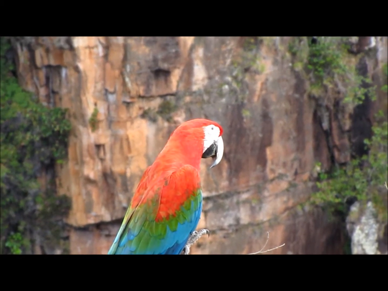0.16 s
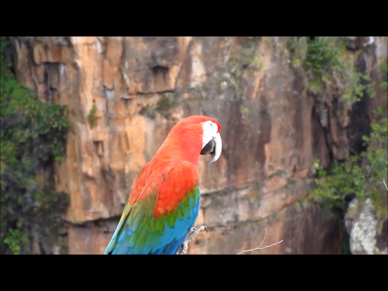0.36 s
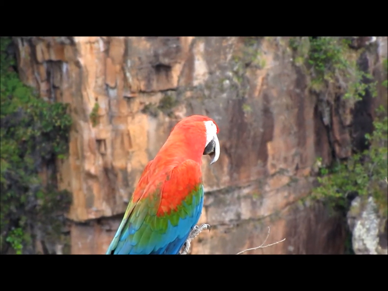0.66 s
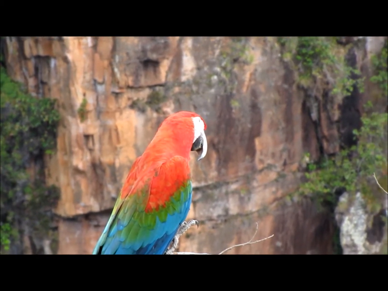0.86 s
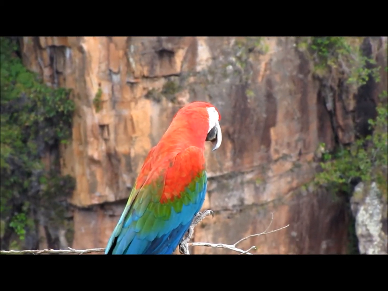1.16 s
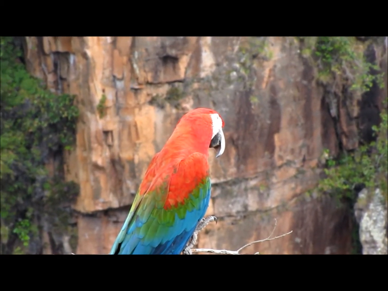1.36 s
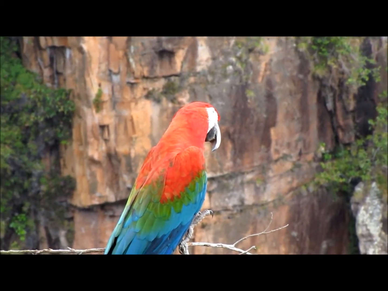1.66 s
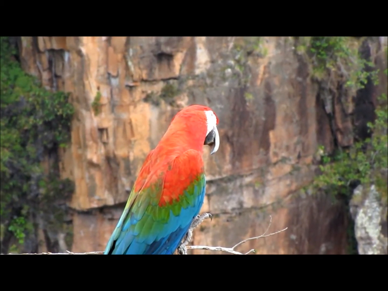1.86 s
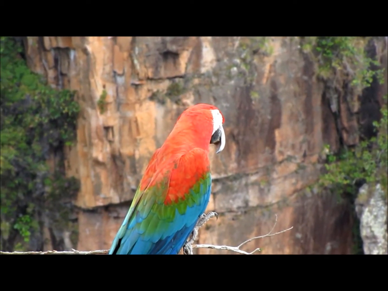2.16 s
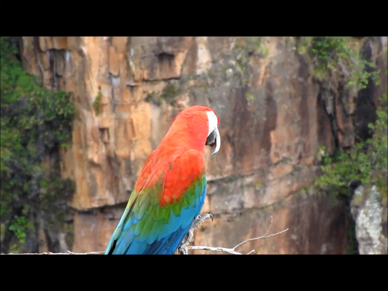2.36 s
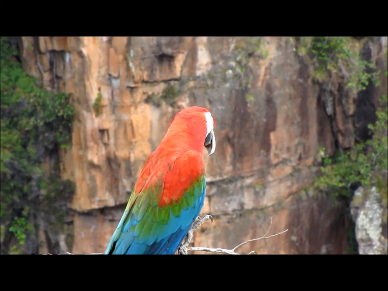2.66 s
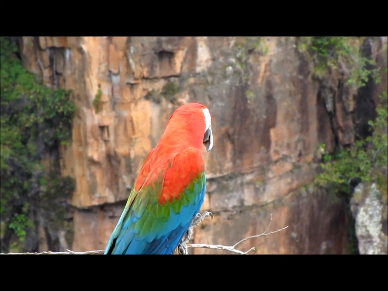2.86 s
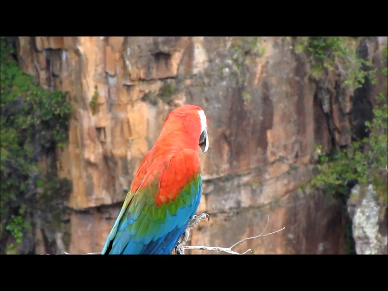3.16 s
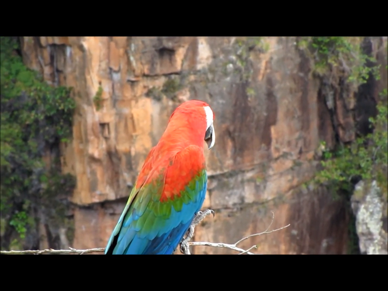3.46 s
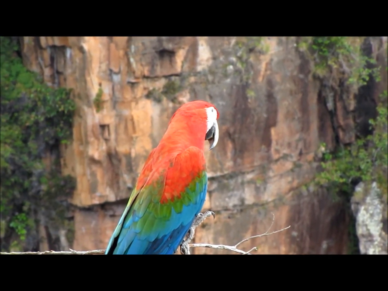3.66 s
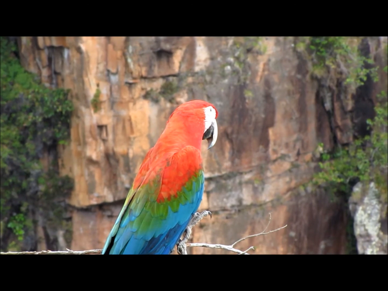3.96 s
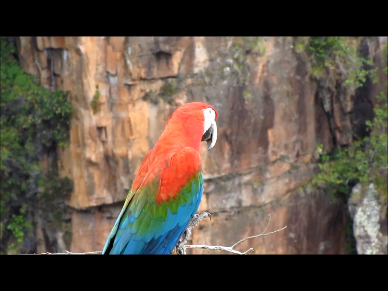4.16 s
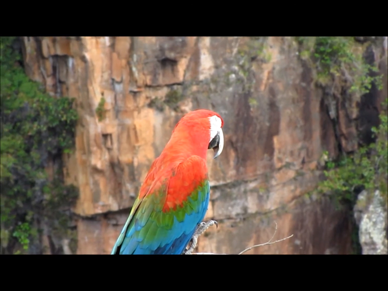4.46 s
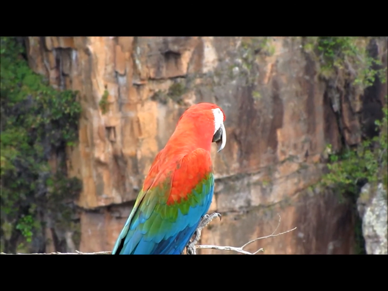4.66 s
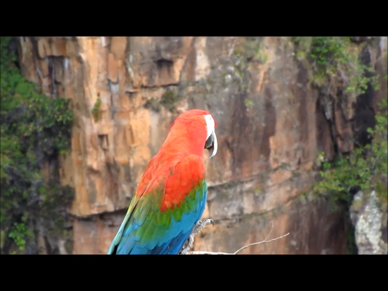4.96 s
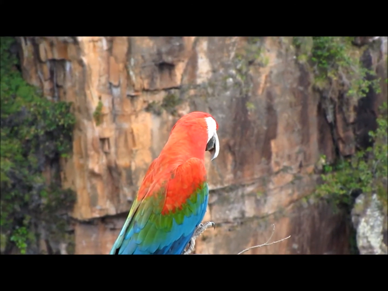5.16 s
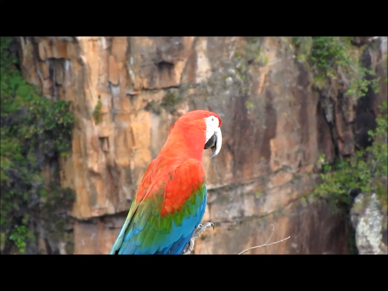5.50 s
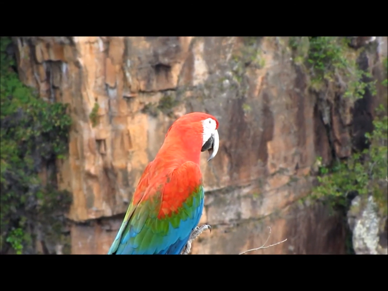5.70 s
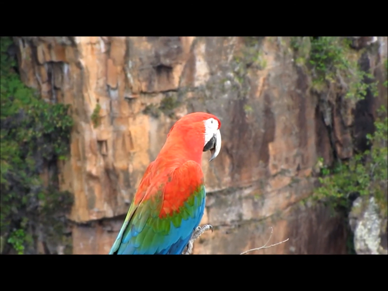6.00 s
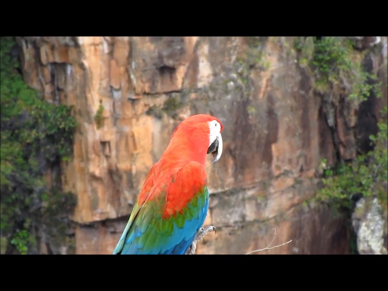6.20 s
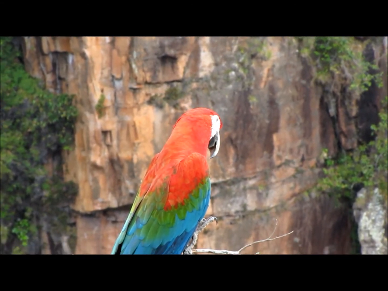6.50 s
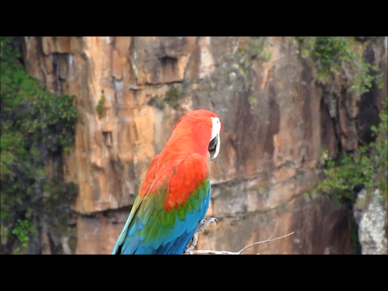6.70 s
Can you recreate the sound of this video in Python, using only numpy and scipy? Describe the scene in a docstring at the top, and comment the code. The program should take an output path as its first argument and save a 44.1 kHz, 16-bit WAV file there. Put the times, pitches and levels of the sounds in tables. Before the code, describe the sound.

A large parrot squawks twice, close to the microphone, in a rocky gorge. The first call is a rasping double syllable with a rattle at its end; the second, after a pause, is one brighter screech with a thin wheeze. Low wind buffeting is strongest at the start, eases in the middle and comes back late. A few dry scrapes open the scene, over a steady distant rush of leaves.

```python
"""A gorge, in front of a cliff: a macaw close by gives two harsh squawks that swell, hold and break off.
The membranes of its syrinx make a chaotic rasp that locks now and then into a louder clear tone or a
subharmonic rattle, shaped by the throat and open beak. Wind buffets mostly the right side of the mic,
a few dry scuffs sound nearby, and air and foliage rush steadily behind, over a faint low drone."""
import sys
import numpy as np
from scipy import signal
from scipy.fft import rfft, irfft, next_fast_len
from scipy.io import wavfile
from scipy.ndimage import uniform_filter1d, map_coordinates

SR = 44100
rng = np.random.default_rng(int(sys.argv[2]) if len(sys.argv) > 2 else 0)


def generate_wav(sig):
    """Save sig (samples, or channels by samples) to the path in sys.argv[1] as 16-bit PCM at SR."""
    pcm = np.round(np.clip(np.atleast_2d(sig).T, -1, 1) * 32767).astype(np.int16)
    wavfile.write(sys.argv[1], SR, pcm)


N = 301644


def amp(db):
    """Decibels to gain."""
    return 10 ** (np.asarray(db) / 20)


def unit(x):
    """Scale to rms 1."""
    return x / np.sqrt(np.mean(x ** 2) + 1e-20)


def steady(x):
    """Hold the short-term rms at 1."""
    return x / np.sqrt(np.abs(uniform_filter1d(x * x, size=700)) + 1e-6)


def along(points, hz):
    """Read (freq_hz, value) points at hz, on a log frequency axis."""
    freqs, values = np.transpose(points)
    return np.interp(np.log(hz + 1), np.log(freqs + 1), values)


def curves(rows):
    """Automation: one value per sample for each column after the time."""
    times, *columns = np.transpose(rows)
    return [np.interp(np.arange(N) / SR, np.sort(times), column) for column in columns]


def during(start, length, edge_s):
    """A gate open for length seconds from start, with soft edges."""
    t = np.arange(N) / SR
    return np.clip(.5 + np.minimum(t - start, start + length - t) / edge_s, 0, 1)


def wobble(rate):
    """A smooth random curve, rate knots a second."""
    return map_coordinates(rng.standard_normal(int(N * rate / SR) + 4), [np.arange(N) * rate / SR])


def filtered(x, response):
    """Multiply the spectrum of x by response(hz)."""
    size = next_fast_len(N + SR // 4)
    return irfft(rfft(x, size) * response(np.fft.rfftfreq(size, 1 / SR)), size)[..., :N]


def coloured(x, points):
    """EQ x with a (freq_hz, gain_db) curve."""
    return filtered(x, lambda hz: amp(along(points, hz)))


def split(x, edge_hz):
    """Crossover: the parts of x below and above an edge."""
    low = filtered(x, lambda hz: 1 / (1 + (hz / edge_hz) ** 20))
    return low, x - low


def sides(db):
    """Left and right gains for a left-minus-right level difference."""
    return amp(np.array([db, -db]) / 2)


def from_left(x, lead_s):
    """The left channel hears x lead_s before the right one."""
    return filtered(x, lambda hz: np.exp(1j * np.pi * hz * lead_s * np.array([[1], [-1]])))


def gorge():
    """A far, even rush of air and foliage, narrow in the bass and wide in the treble."""
    # strength of the rush: time_s, level_db
    strength = [(0, -36), (.6, -37.5), (1.4, -35), (2.1, -36), (3.2, -35), (4, -36.5), (4.6, -34.5),
                (6.84, -35.5)]
    # likeness of left and right: freq_hz, correlation
    likeness = [(60, 0.77), (130, 0.87), (380, 0.94), (700, 0.84), (1300, 0.69), (2400, 0.66), (4400, 0.37),
                (8000, 0.21), (15000, .2)]
    # spectrum of the rush: freq_hz, gain_db
    colour = [(15, 9), (28, 10.5), (50, 3), (75, 2), (130, -0.5), (250, -0.5), (480, 2), (1100, -0.5),
              (2100, -4.5), (3600, -7.5), (5000, -12.5), (6500, -23.5), (8500, -27.5), (11500, -37.5),
              (15500, -42)]
    # lean of each band: freq_hz, left_minus_right_db
    balance = [(30, 1.5), (1200, 0.5), (2100, -5), (2900, 1.5), (3700, 6), (4700, 3), (6000, 3), (9000, -1),
               (15000, 1)]

    def mid_side_gains(hz):
        width = np.arccos(np.clip(along(likeness, hz), -1, 1)) / 2
        return amp(along(colour, hz)) * [np.cos(width), np.sin(width)]
    rush_db, = curves(strength)
    mid, side = filtered(rng.standard_normal((2, N)), mid_side_gains)
    stereo = filtered(np.array([mid + side, mid - side]), lambda hz: sides(along(balance, hz)))
    low, high = split(unit(stereo), edge_hz=1654)
    rush = amp(rush_db + 0.073 * wobble(2.8)) * low
    foliage = amp(rush_db + 0.5 + 0.11 * wobble(3.2)) * from_left(high, lead_s=0.00017)
    return rush + foliage


def hum():
    """A faint low drone that wavers a little."""
    level_db = -49.5 + 1.3 * wobble(3)
    pitch_hz = 75.6 + wobble(2.7)
    return amp(level_db) * unit(np.sin(2 * np.pi * np.cumsum(pitch_hz) / SR))


def wind():
    """Breeze and gusts make lumpy low pressure noise, unrelated left and right; single eddies thump."""
    # breeze on the exposed right side: time_s, level_db
    breeze = [(0, -18.5), (.78, -21), (.9, -27.5), (1.65, -27.5), (2.2, -33), (2.75, -46), (4.4, -50),
              (6, -37.5), (6.84, -23.5)]
    # gusts: centre_s, half_width_s, level_db, left_minus_right_db
    gusts = [(0.137, 0.1, -14, -29), (0.496, .05, -23, -4), (1.056, 0.14, -16, -19), (1.347, 0.076, -26, 5),
             (1.476, 0.15, -19, -24), (1.746, .08, -24.5, 11), (2.14, 0.092, -32, -9), (3.22, .06, -34, 1),
             (3.78, 0.07, -36, -12), (4.591, 0.055, -29, -17), (4.89, 0.1, -31.5, -23),
             (5.194, 0.046, -34, -16), (5.527, 0.086, -33, -14), (6.232, .06, -23.5, -9),
             (6.524, 0.031, -26, 3), (6.788, .07, -27, -19)]
    # spectrum of the buffeting: freq_hz, gain_db
    buffet = [(8, -44), (16, -10), (48, 4), (72, 1), (120, -7.5), (200, -16), (370, -29.5), (650, -45.5),
              (1100, -91.5)]
    # eddies that hit the right side: start_s, level_db, pitch_hz
    thumps = [(0.106, -12, 125), (.305, -9.5, 111), (1.031, -7.5, 95), (1.473, -11.5, 78), (1.72, -14, 154),
              (6.225, -11.5, 68.5), (6.771, -24, 112)]
    t = np.arange(N) / SR
    breeze_db, = curves(breeze)
    sheltered_db = -38 + 0.53 * (breeze_db - breeze_db.max())
    power = amp(np.array([sheltered_db, breeze_db])) ** 2
    for centre, half_width, db, pan_db in gusts:
        pan = sides(np.array([pan_db]))
        envelope = np.exp(-2 * ((t - centre) / half_width) ** 2)
        power += (amp(db) * pan / np.linalg.norm(pan) * envelope) ** 2
    lumps = amp(1.65 * np.array([wobble(18), wobble(22)]))
    out = np.sqrt(power) * unit(lumps * coloured(rng.standard_normal((2, N)), buffet))
    for start, db, hz in thumps:
        cycles = np.maximum(t - start, 0) * hz
        out[1] += amp(db) * np.sin(2 * np.pi * cycles) * 2 * cycles * np.exp(1 - 2 * cycles)
    return out


def scuffs():
    """Short dry scrapes close by, a little to the right; the heavier ones have more body."""
    # scuffs and ticks: start_s, level_db, body_db, rise_s, t60_s
    scrapes = [(0.07, -36, 0, .0005, 0.055), (0.082, -23.5, -16, 0.0025, 0.035),
               (0.095, -40, -1, 0.0025, 0.17), (.141, -37.5, -5, 0.0018, .07),
               (.2175, -38, -5, .0005, 0.04), (0.227, -37.5, 2, 0.013, 0.27),
               (0.245, -28, 6, 0.00083, 0.027), (.257, -30.5, 4, .001, 0.02), (.282, -27, 0, 0.0074, 0.083),
               (0.833, -43.5, -8, .001, .02), (3.353, -40, -4, .0005, 0.015),
               (4.294, -30, -8, 0.00044, 0.012), (6.776, -39, -4, .0005, 0.025)]
    # spectrum of the grit: freq_hz, gain_db
    colour = [(800, -21), (2200, 2), (3300, 6), (5000, -6), (7000, -2), (10000, -2), (13000, -12),
              (16000, -20.5)]
    out, t = np.zeros((2, N + SR)), np.arange(SR // 8) / SR
    body_lowpass = signal.butter(2, 4200, fs=SR, output="sos")
    for start, db, body_db, rise, t60 in scrapes:
        grit = rng.standard_normal((2, len(t))) + rng.standard_normal(len(t))
        grit += amp(body_db) * signal.sosfilt(body_lowpass, 2 * rng.standard_normal(len(t)))
        envelope = amp(db - 2.5 - 60 * t / t60) * (1 - np.exp(-t / rise))
        out[:, round(start * SR):][:, :len(t)] += envelope * grit
    return sides(np.array([-3.5])) * coloured(out[:, :N], colour)


def swell(start, attack, length, depth_db, bend, release_db_per_s):
    """Envelope in dB below its top: out of silence, depth_db down at start, then a hold and fast fall."""
    t = np.arange(N) / SR - start
    rise = depth_db * np.maximum(1 - t / attack, 0) ** bend
    fall = release_db_per_s * (np.maximum(t - length, 0) + np.maximum(-t, 0))
    return np.maximum(-rise - fall, -120)


def effort(syllables, low_depth_db, high_depth_db, release_db_per_s):
    """Gains of the voice's low and high band; each swells from its own depth."""
    low, high = np.zeros((2, N))
    bend = 2.28  # the attack flattens towards the top
    for start, attack, length, db, treble_db in syllables:
        low += amp(db + swell(start, attack, length, low_depth_db, bend, release_db_per_s))
        high += amp(db + treble_db + swell(start, attack, length, high_depth_db, bend, release_db_per_s))
    return low, high


def regime(rough, sub):
    """Roughness, subharmonic share and band trims: those of the rasp, except while the membranes lock."""
    # locks into tone or rattle: start_s, length_s, roughness, subharmonic_share, bass_db, treble_db
    locks = [(1.156, 0.0394, 0.06, 0.04, -2.5, 0.5), (1.303, 0.1229, 0.02, 0, -1, -2),
             (1.499, .033, 0.45, 0.55, .3, 3.5), (1.537, .06, 0, 0.01, -1, 0),
             (1.599, 0.044, 0.05, 0.92, -2.5, -2.5), (1.658, 0.018, 0.04, 0.23, -2, 1),
             (4.431, .028, 0.05, 0.15, -1.5, 1.6), (4.459, .028, 0.05, 0.1, 2.5, -0.5),
             (4.574, 0.043, 0.42, 0.01, -1, 2.5), (4.656, .053, 0.24, 0.05, -3, 0)]
    rasp = np.array([rough, sub, 0, 0])
    flips = sum(np.outer(np.array(lock) - rasp, during(start, length, edge_s=0.012))
                for start, length, *lock in locks)
    state = rasp[:, None] + flips
    return *np.clip(state[:2], 0, 1), *state[2:]


def pulses(phase, count=18):
    """One pulse a cycle; the membranes close gradually, so its equal harmonics spread over the cycle."""
    harmonics = (np.cos(2 * np.pi * (k * phase - k * k / count / 2)) for k in range(1, count + 1))
    return sum(harmonics) * np.sqrt(2 / count)


def resonate(x, throat):
    """The throat as a causal filter with a (freq_hz, gain_db) curve: every pulse rings on."""
    def minimum_phase(hz):
        cepstrum = irfft(np.log(amp(along(throat, hz))))
        half = len(cepstrum) // 2
        return np.exp(rfft(cepstrum * np.r_[1, np.full(half - 1, 2), 1, np.zeros(half - 1)]))
    return filtered(x, minimum_phase)


def squawk(pitches, throat, gains, state, jitter, chaos_jitter, throb_hz, flutter_db,
           low_loss_db, high_loss_db, rattle_loss_db):
    """Membranes lock, slip to two thirds of the pitch or break into chaos, and sound through the throat."""
    pitch_hz, = curves(np.vstack(pitches))
    low_gain, high_gain = gains
    rough, sub, low_db, high_db = state
    voiced = low_gain > 1e-4
    # the cycles grow uneven as the voice roughens
    detune = (jitter + chaos_jitter * rough) * (0.686 * wobble(450) + .5 * wobble(110))
    phase = np.cumsum(pitch_hz * (1 + detune))[voiced] / SR
    # the slower vibration is lopsided, so its odd harmonics are the stronger
    slow_phase = phase * 2 / 3
    rattle = pulses(slow_phase, count=27) - 0.12 * pulses(slow_phase + .5, count=27)
    tone = np.sqrt(1 - sub[voiced]) * pulses(phase) + np.sqrt(sub[voiced]) * rattle
    # turbulent air, brighter than the tone: freq_hz, gain_db
    rasp_colour = [(1400, 0.5), (2400, -1), (3200, 4), (4000, 3), (4650, 8.5), (5600, 7), (8000, 3.5),
                   (12000, 2)]
    puffs = 1 + 0.57 * np.cos(2 * np.pi * phase)  # the air escapes once a cycle
    rasp = coloured(rng.standard_normal(N), rasp_colour)[voiced] * puffs
    source = np.zeros(N)
    source[voiced] = np.sqrt(1 - rough[voiced]) * tone + 1.23 * np.sqrt(rough[voiced]) * rasp
    low, high = split(resonate(source, throat), edge_hz=1740)
    # a rough voice comes in quick, uneven throbs
    throb = np.sin(2 * np.pi * np.cumsum(throb_hz * (1 + 0.433 * wobble(120))) / SR)
    flutter = amp(flutter_db * np.sqrt(rough + sub / 4 + 0.024) * throb)
    # chaos wastes effort, and the rattle is duller than the clear tone
    low_gain = low_gain * amp(low_db - low_loss_db * rough)
    high_gain = high_gain * amp(high_db - high_loss_db * rough - rattle_loss_db * sub)
    return flutter * (low_gain * steady(low) + high_gain * steady(high))


def first_squawk():
    """Two syllables of rasp that lock into clear tone and rattle."""
    # pitch of the syrinx, one curve per syllable: time_s, pitch_hz
    pitches = [
        [(1.05, 630), (1.125, 642.5), (1.167, 732.6), (1.186, 674.8), (1.2, 545)],
        [(1.28, 577), (1.35, 651.4), (1.40, 679), (1.45, 658.3), (1.515, 732.6), (1.545, 736.6), (1.58, 668),
         (1.6, 692), (1.635, 676.6), (1.658, 725.4), (1.685, 580)],
    ]
    # resonances of the throat and open beak: freq_hz, gain_db
    throat = [(350, -24.5), (650, -17), (950, -9.5), (1350, 0.5), (1720, -10.5), (2150, -4), (2600, -11.5),
              (3200, -11), (3850, -18.5), (4550, -20.5), (5400, -32), (6500, -37), (7300, -43.5),
              (11000, -50), (15000, -66)]
    # pushes of effort: start_s, attack_s, length_s, level_db, treble_over_bass_db
    syllables = [(1.045, 0.097, 0.152, -16.5, -4), (1.26, 0.15, 0.4105, -17.5, -4.5)]
    gains = effort(syllables, low_depth_db=16.5, high_depth_db=23.5, release_db_per_s=751)
    return squawk(pitches, throat, gains, regime(rough=0.65, sub=0.95),
                  jitter=0.0078, chaos_jitter=0.03, throb_hz=60.4, flutter_db=2.0,
                  low_loss_db=12.5, high_loss_db=6.5, rattle_loss_db=4)


def cliff(x):
    """Rock and bushes scatter a short tail; the mids die first and the top lingers."""
    # decay of the scatter: freq_hz, t60_s
    decay = [(300, 0.12), (2000, 0.043), (10000, 0.5)]
    hz, t, noise = signal.stft(rng.standard_normal((2, SR // 2)), SR, nperseg=256)
    _, tail = signal.istft(noise * amp(-60 * t / along(decay, hz)[:, None]), SR, nperseg=256)
    return signal.fftconvolve(x, tail / np.linalg.norm(tail[0]), axes=1)[:, :N]


def wheeze():
    """An unsteady whistle near 3 kHz leads into the second squawk and rides on its rasp."""
    # path of the whistle: time_s, pitch_hz
    pitches = [(4.24, 2960), (4.37, 3120), (4.43, 2670), (4.48, 2930), (4.51, 2780), (4.57, 3260),
               (4.6, 2777), (4.652, 3270), (4.68, 2684)]
    pitch_hz, = curves(pitches)
    phase = np.cumsum(pitch_hz + 166.6 * wobble(700)) / SR
    whistle = np.sin(2 * np.pi * phase) * amp(3.1 * wobble(220))
    swell_db = swell(start=4.155, attack=0.38, length=.52, depth_db=24, bend=1.57, release_db_per_s=650)
    return amp(-23.5 + swell_db) * unit(whistle)


def second_squawk():
    """One brighter syllable of rasp and tone, with little rattle."""
    # pitch of the syrinx: time_s, pitch_hz
    pitches = [
        [(4.42, 635), (4.435, 710), (4.456, 718.6), (4.467, 599), (4.488, 581.5), (4.51, 534.4), (4.585, 718),
         (4.625, 684), (4.67, 916.4), (4.69, 872), (4.711, 674)],
    ]
    # resonances of the throat and open beak: freq_hz, gain_db
    throat = [(350, -25), (600, -6), (950, 0), (1400, 8), (1650, -7), (2150, 2.5), (2650, 2), (3300, -7),
              (3900, -16), (4200, -14), (4650, -21), (5400, -34), (7700, -36), (9000, -50), (15000, -61)]
    # push of effort: start_s, attack_s, length_s, level_db, treble_over_bass_db
    syllables = [(4.29, 0.19, 0.3786, -20, 0.84)]
    gains = effort(syllables, low_depth_db=15, high_depth_db=14, release_db_per_s=406)
    return squawk(pitches, throat, gains, regime(rough=0.61, sub=0.13),
                  jitter=0.00884, chaos_jitter=0.03687, throb_hz=66, flutter_db=3.4,
                  low_loss_db=8.5, high_loss_db=4.5, rattle_loss_db=3.5)


def scene():
    """The macaw in front of the cliff, with the air around it."""
    # lean of each band of the voice: freq_hz, left_minus_right_db
    balance = [(600, -0.5), (1350, 1.5), (2300, -4), (3300, -4.5), (4500, 0), (8000, 0)]
    voice = first_squawk() + second_squawk() + wheeze()
    macaw = from_left(filtered(voice, lambda hz: sides(along(balance, hz))), lead_s=4e-5)
    echo = amp(-19) * cliff(macaw)
    return macaw + echo + wind() + scuffs() + gorge() + hum()


def record(dry):
    """A brick-wall low-pass takes off the very top."""
    return filtered(dry, lambda hz: hz < 15750)


dry = scene()
out = record(dry)
generate_wav(out)
```